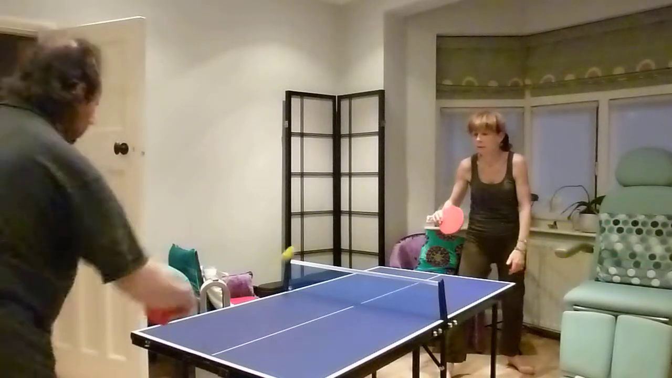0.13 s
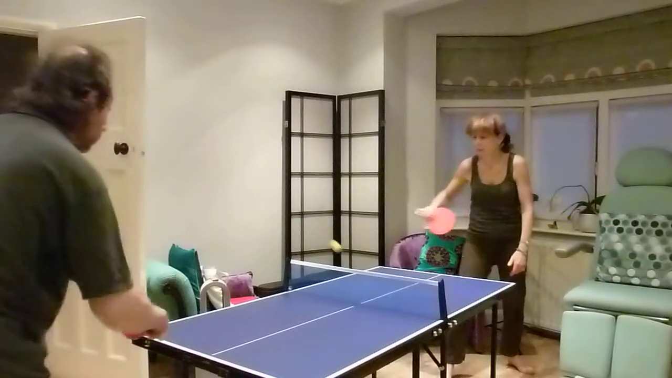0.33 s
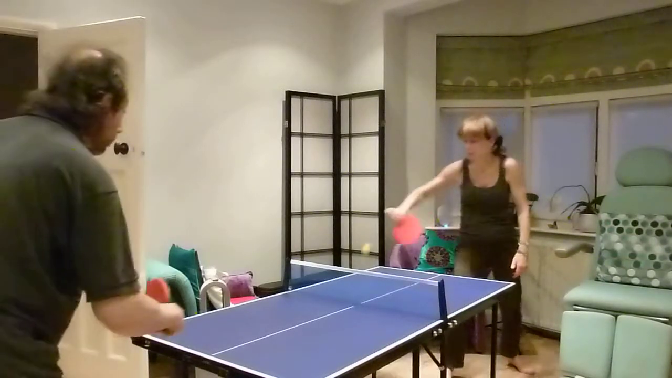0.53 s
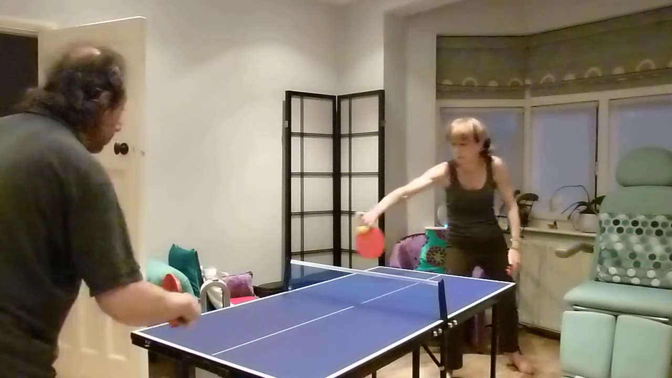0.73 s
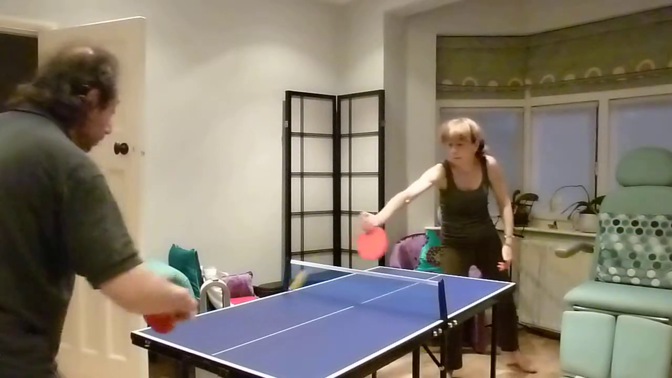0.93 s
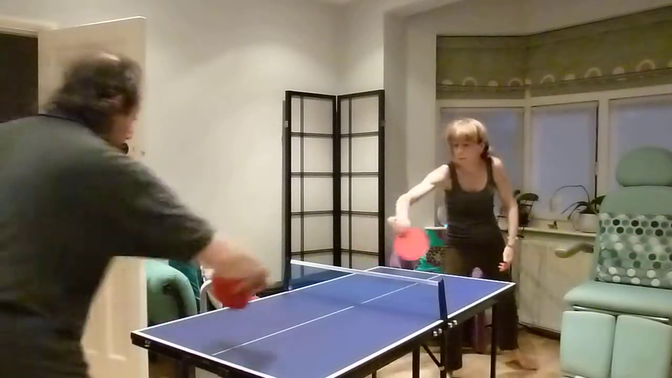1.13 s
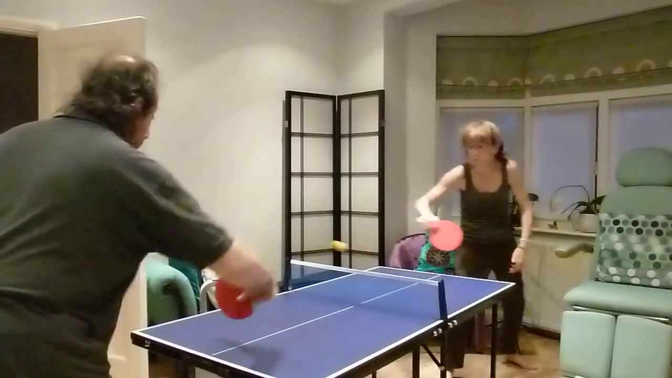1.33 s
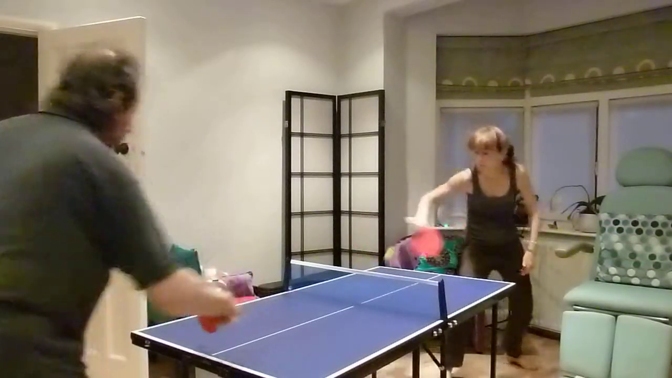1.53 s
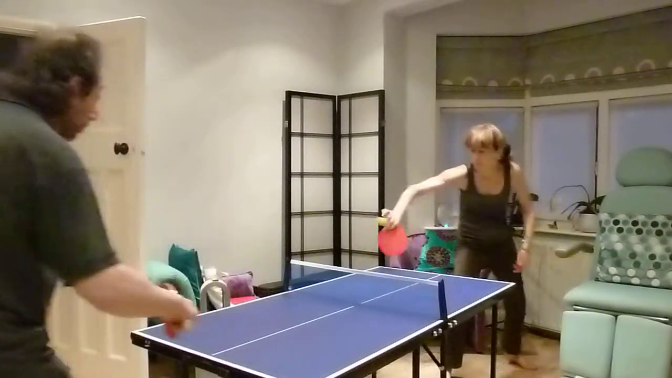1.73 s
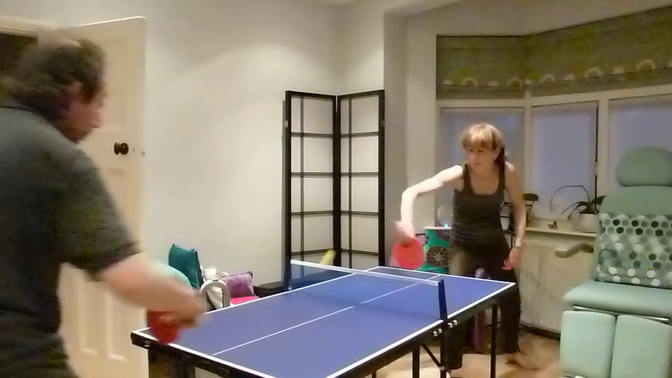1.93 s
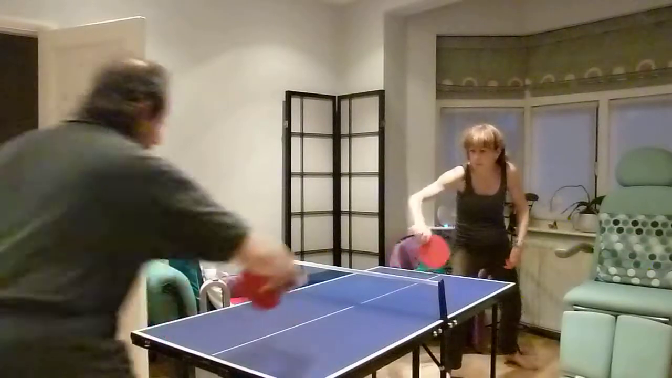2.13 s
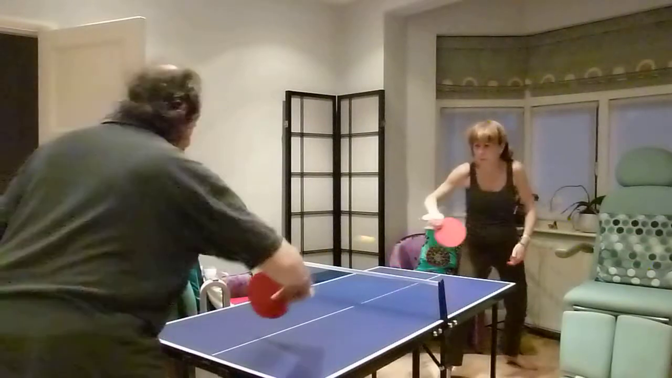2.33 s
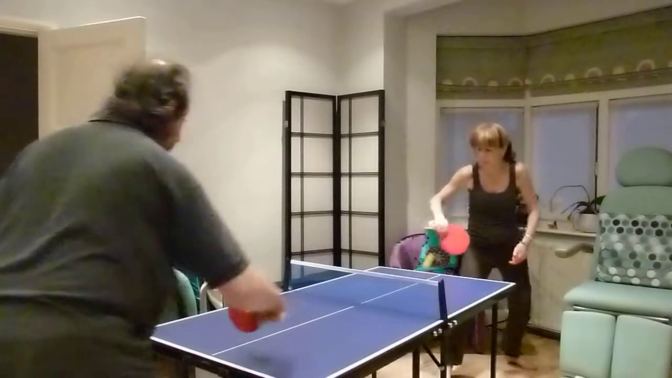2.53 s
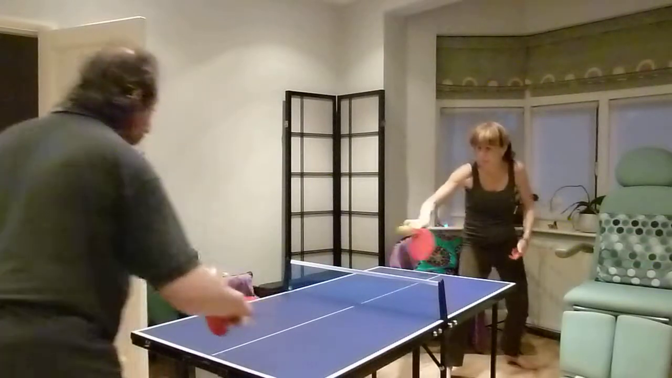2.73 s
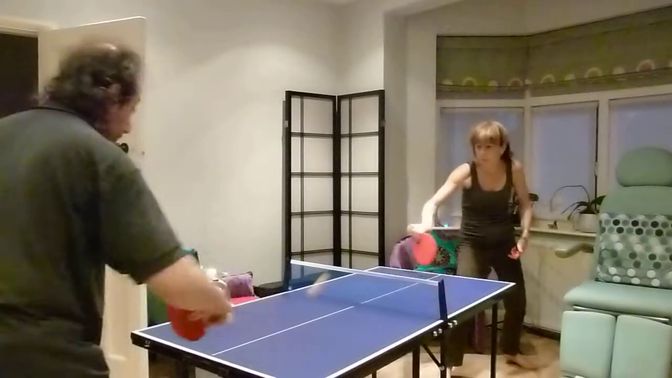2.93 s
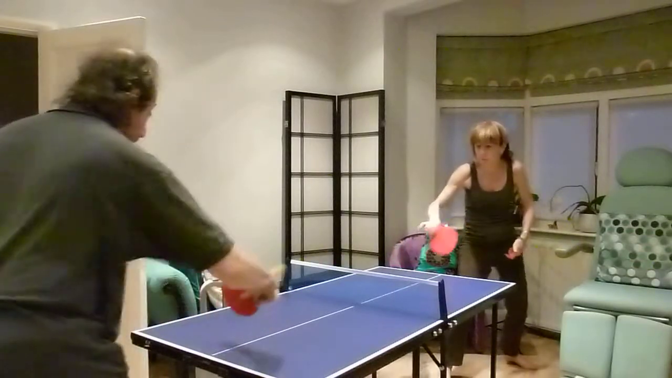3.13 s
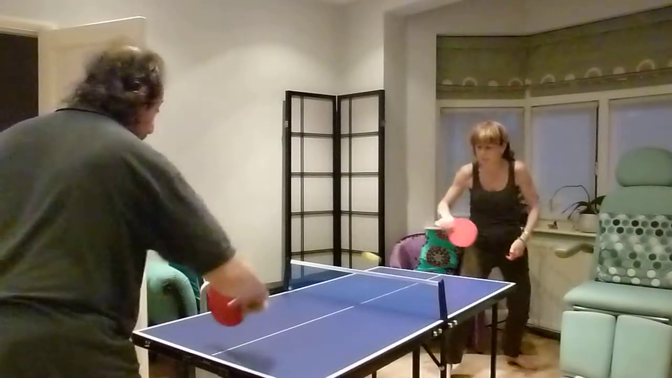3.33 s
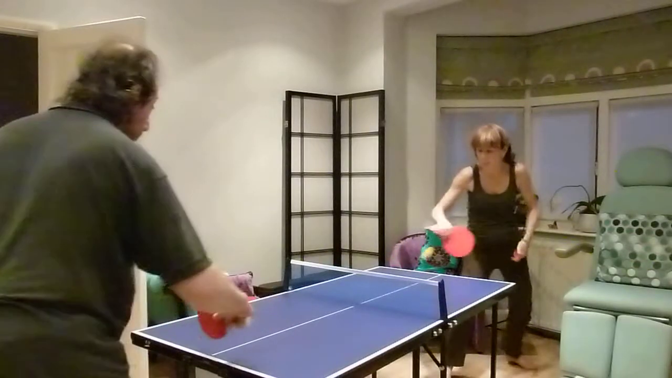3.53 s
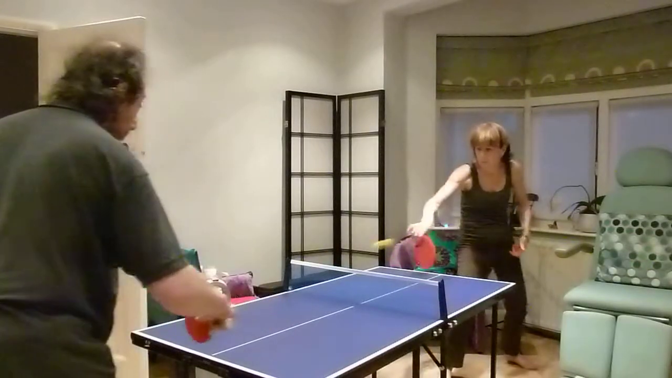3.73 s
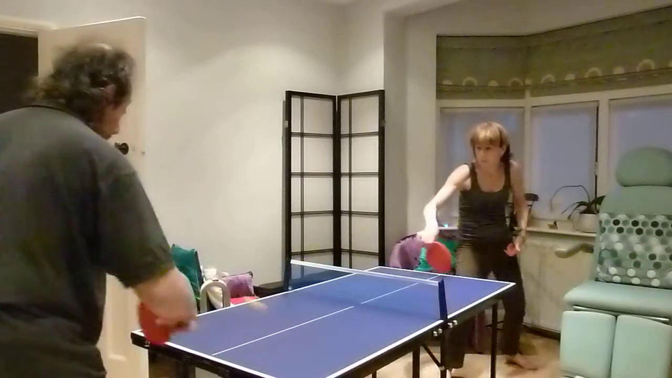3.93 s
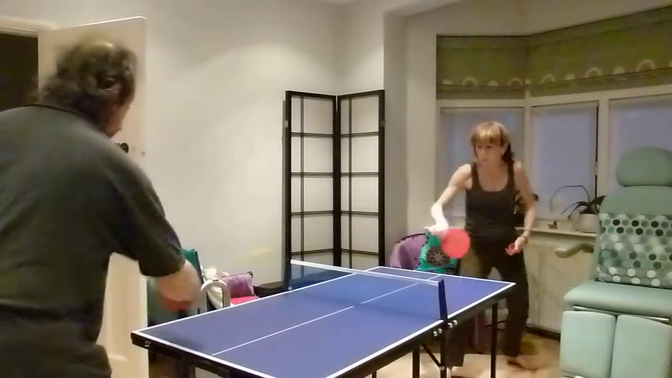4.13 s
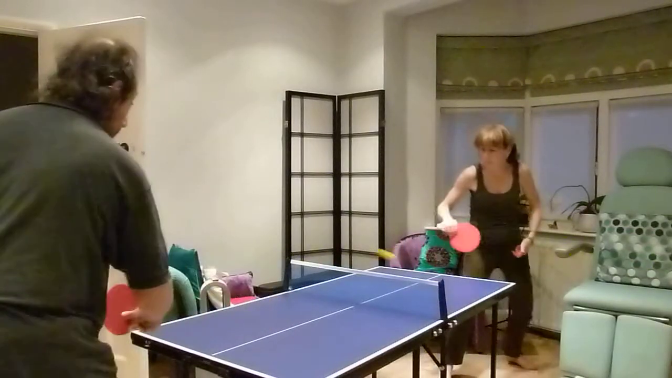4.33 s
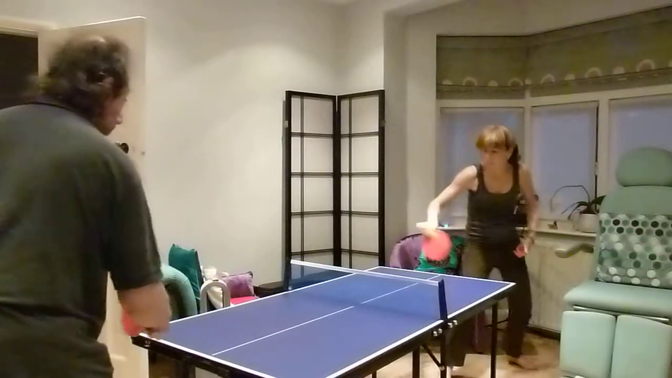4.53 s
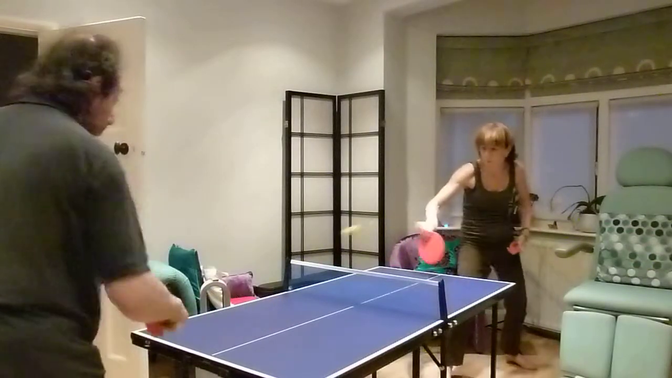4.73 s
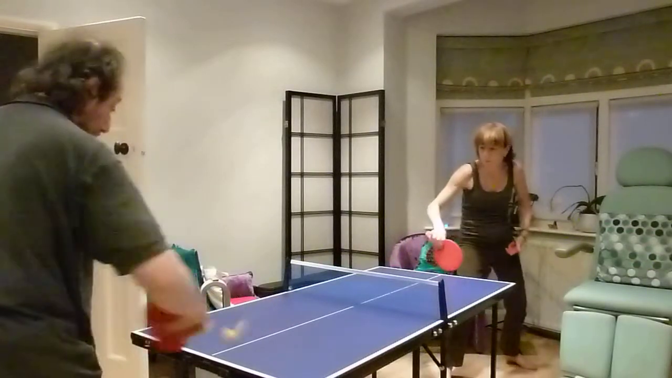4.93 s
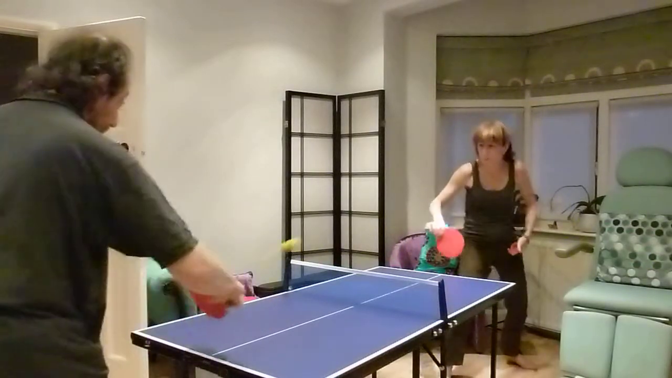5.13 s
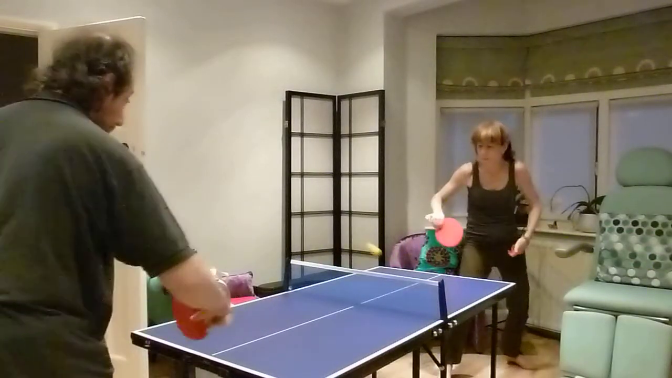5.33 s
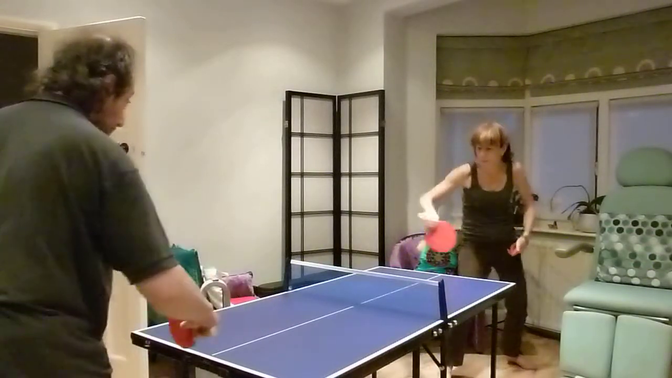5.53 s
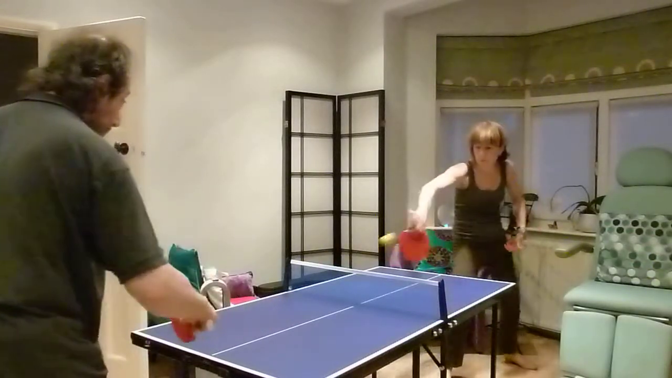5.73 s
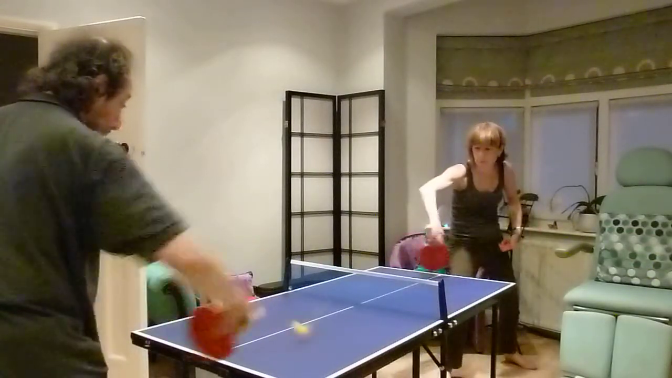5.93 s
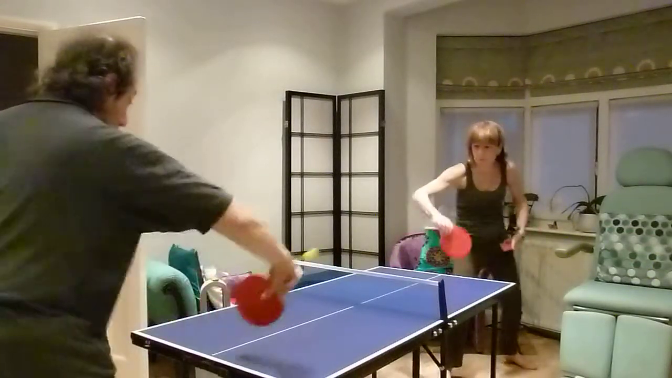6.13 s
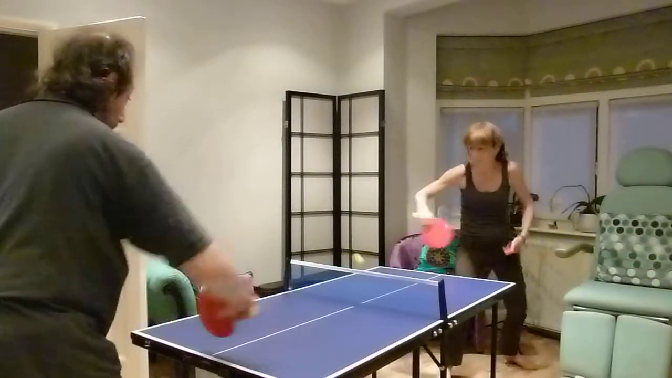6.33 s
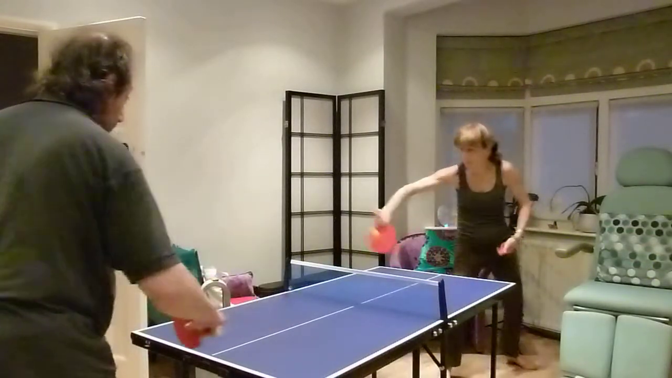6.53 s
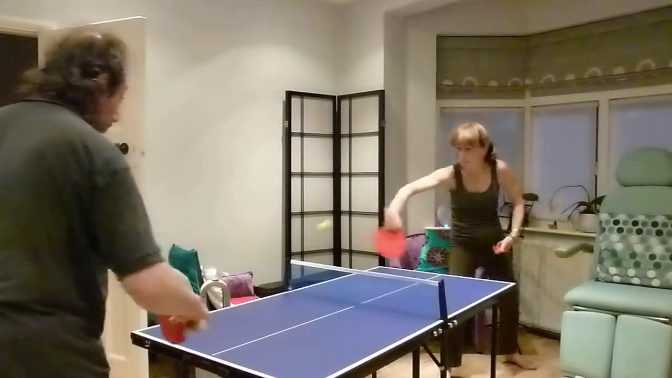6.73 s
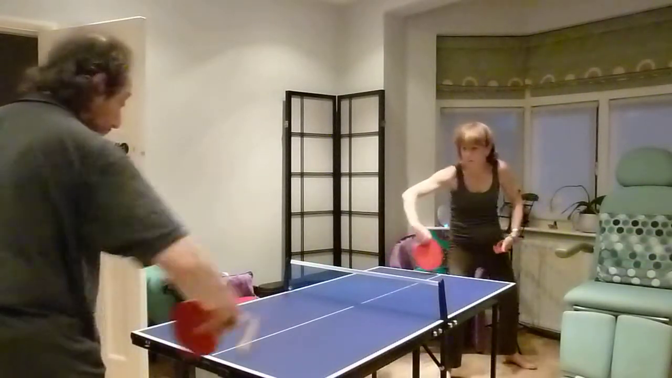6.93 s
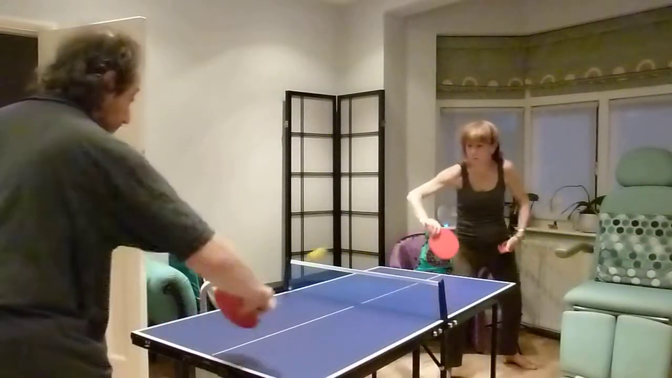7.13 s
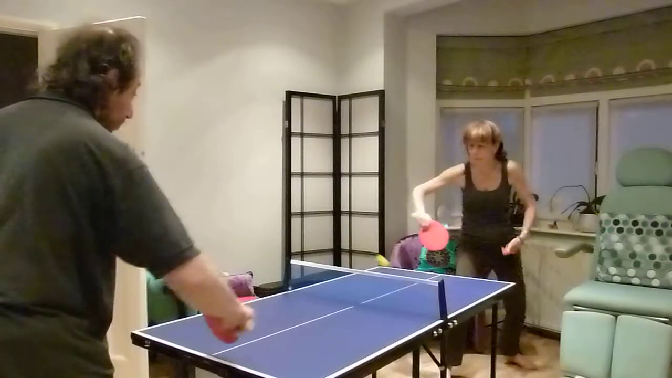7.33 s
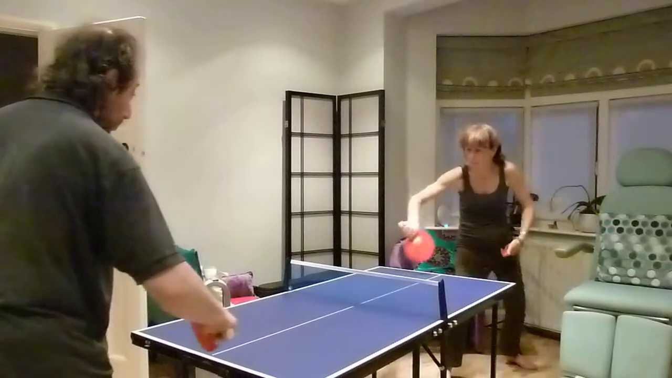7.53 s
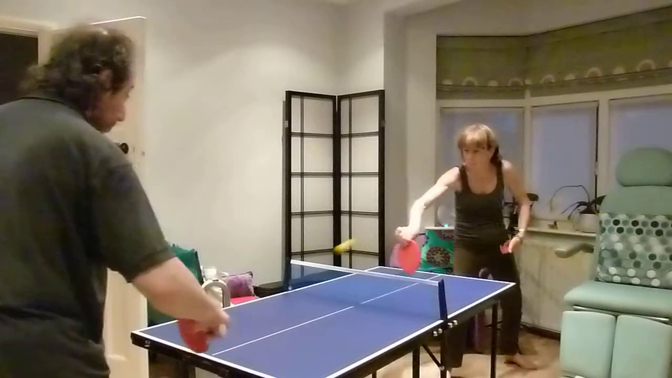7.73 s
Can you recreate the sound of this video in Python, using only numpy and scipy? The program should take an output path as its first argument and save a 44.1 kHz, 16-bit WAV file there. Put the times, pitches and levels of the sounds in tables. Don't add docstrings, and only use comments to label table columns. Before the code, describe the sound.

Crisp, dry knocks and clicks of a light hollow ball keep an even rhythm without a miss. Near table bounces are strongest, far ones a little weaker; the wooden bats with rubber give shorter, quieter pocks with a brief woody ring. Feet thump softly in the first couple of seconds, with one faint scuff late. A live domestic room answers for about half a second, captured close by a small camera with slightly limited treble.

```python
import sys
import numpy as np
from scipy import signal
from scipy.fft import rfft, irfft
from scipy.io import wavfile

SR = 44100
rng = np.random.default_rng(int(sys.argv[2]) if len(sys.argv) > 2 else 0)


def transcribe(u):
    v = np.clip(np.atleast_2d(u).T, -1, 1)
    q = np.round(v * 32767).astype(np.int16)
    wavfile.write(sys.argv[1], SR, q)


def voltage_ratio(level):
    return 10 ** (np.asarray(level, float) / 20)


N = 347111
TAIL = int(.75 * SR)
SINCE_BLOW = np.arange(SR // 4) / SR


def at_hz(points, hz):
    point_hz, value = np.array(points).T
    return np.interp(np.log(hz + 1), np.log(point_hz), value)


def two_ports(mid, side, hz):
    # (frequency [Hz], likeness [0-1])
    likeness = [(40, .96), (110, .999), (400, .998), (800, .92), (2200, .8), (4500, .5), (7000, .65),
                (8000, .98)]
    alike = np.clip(at_hz(likeness, hz), 0, 1)
    opposite = np.array([[1], [-1]])
    return np.sqrt((1 + alike) / 2) * mid + np.sqrt((1 - alike) / 2) * side * opposite


def air():
    # (frequency [Hz], density [dB per Hz])
    hush_spectrum = [(18, -55), (36, -14.5), (200, -5.5), (850, -17), (2560, -25.5), (6010, -26),
                     (7400, -35), (9620, -56.5)]
    hz = np.fft.rfftfreq(N, 1 / SR)
    noise = two_ports(*rfft(rng.standard_normal((2, N))), hz)
    hush = irfft(noise * voltage_ratio(at_hz(hush_spectrum, hz)), N)
    return voltage_ratio(-52) * hush / np.std(hush)


def echoes():
    density = np.clip(.07 + (np.arange(TAIL) / SR / .035) ** 2, 0, 1)
    arrives = rng.random(TAIL) < density
    return rfft(rng.standard_normal((2, TAIL)) * arrives / np.sqrt(density))


def room_answer(place, direct_db, first_echo_s):
    # (frequency [Hz], t60 [s])
    room_t60 = [(80, 0.44), (250, 0.48), (700, 0.46), (2000, 0.47), (4000, 0.46), (8000, 0.36)]
    # (frequency [Hz], share [0-1])
    same_room = [(250, .8), (700, .4), (1500, 0)]
    edge_on_hz = 4500
    t, hz = np.arange(TAIL) / SR, np.fft.rfftfreq(TAIL, 1 / SR)

    same = at_hz(same_room, hz)
    reflections = np.sqrt(same) * place + np.sqrt(1 - same) * echoes()
    ports, answer = two_ports(*reflections, hz), 0
    for k, (_, t60) in enumerate(room_t60):
        band = [(band_hz, j == k) for j, (band_hz, _) in enumerate(room_t60)]
        answer = answer + irfft(ports * at_hz(band, hz), TAIL) * voltage_ratio(-60 * t / t60)

    early = 1 + 1.2 * np.exp(-t / 0.012)
    answer = answer * early * np.clip(t / first_echo_s - .5, 0, 1) * 0.055
    fade = np.exp(-2 * np.pi * edge_on_hz / SR)
    answer += voltage_ratio(direct_db) * (1 - fade) * fade ** np.arange(TAIL)
    return answer


def add(mix, sound, s):
    at = round(s * SR)
    part = sound[:, max(-at, 0):N - at]
    mix[:, max(at, 0):max(at, 0) + part.shape[1]] += part


def blow(s, peak_db, modes, colour, click, beam, place, direct_db, first_echo_s, spread_cycles):
    t = SINCE_BLOW
    hz, mode_db, t60 = np.array(modes).T[:, :, None]
    pitch_luck, level_luck = rng.standard_normal((2, len(modes), 1))
    spot_hz = hz * (1 + .005 * pitch_luck)
    ring_db = mode_db + at_hz(colour, hz) + 1.3 * level_luck - 60 * t / t60
    swell = 1 - np.exp(-t * hz / spread_cycles)
    rings = voltage_ratio(ring_db) * swell * np.sin(2 * np.pi * spot_hz * t)
    body = rings[::2].sum(axis=0) - rings[1::2].sum(axis=0) + click
    heard = signal.fftconvolve(room_answer(place, direct_db, first_echo_s), body[None], axes=1)

    beam_hz, beam_width_hz, beam_db = beam
    resonance = signal.iirpeak(beam_hz, beam_hz / beam_width_hz, SR)
    heard[:, :len(t)] += voltage_ratio(beam_db) * signal.lfilter(*resonance, click)
    out = np.zeros((2, N))
    add(out, voltage_ratio(peak_db) * heard, s - .0006)
    return out


def strokes(events, modes, blade_hz, crack_db, direct_db, first_echo_s, spread_cycles):
    mix, place = 0, echoes()
    no_beam = (3000, 400, -90)
    crack_t = SINCE_BLOW / .00008
    crack = np.gradient(np.exp(-crack_t) * crack_t)
    for s, peak_db, *upper_db, tick_db in events:
        click = voltage_ratio(crack_db + tick_db) * crack
        colour = list(zip(blade_hz, (0, *upper_db, tick_db)))
        mix = mix + blow(s, peak_db, modes, colour, click, no_beam,
                         place, direct_db, first_echo_s, spread_cycles)
    no_bass = signal.butter(2, 170, "high", fs=SR, output="sos")
    return signal.sosfilt(no_bass, mix + 1e-18)


def press(t, contact_s):
    along = np.clip(t / contact_s, 0, 1)
    return np.sin(np.pi * along) * np.exp(-.2 * along)


def bounces(events, modes, beam, force_db, direct_db, first_echo_s, spread_cycles):
    mix, place = 0, echoes()
    small = signal.butter(2, 2800, "high", fs=SR, output="sos")
    for s, peak_db, boom_db, click_db, contact_ms in events:
        click = voltage_ratio(force_db + click_db) * signal.sosfilt(small, press(SINCE_BLOW, contact_ms / 1000))
        colour = [(250, boom_db), (550, 0)]
        mix = mix + blow(s, peak_db, modes, colour, click, beam,
                         place, direct_db, first_echo_s, spread_cycles)
    return mix


def feet():
    # (time [s], length [s], thump [dB], scuff [dB])
    footfalls = [
        (0.246, 0.041, -40.5, -49.5),
        (0.901, 0.067, -48, -56),
        (1.307, 0.046, -38, -43),
        (1.454, 0.021, -36, -45.5),
        (1.998, 0.094, -36.5, -60.5),
        (2.186, 0.09, -34, -45),
        (3.754, 0.016, -63.5, -72),
        (4.167, 0.027, -47.5, -64),
        (5.82, .03, -68, -60),
        (6.566, 0.015, -61, -40),
    ]
    mix, t = np.zeros((2, N)), SINCE_BLOW
    dull = signal.butter(2, [110, 450], "band", fs=SR, output="sos")
    bright = signal.butter(1, [1500, 7000], "band", fs=SR, output="sos")
    for s, length, thump_db, scuff_db in footfalls:
        rub = rng.standard_normal((2, len(t))) * (t / length) * np.exp(1 - 2 * t / length)
        thump = voltage_ratio(thump_db + 13.5) * signal.sosfilt(dull, rub[0])
        scuff = voltage_ratio(scuff_db + 6) * signal.sosfilt(bright, rub[1])
        room = room_answer(echoes(), -24.5, 0.001)
        add(mix, signal.fftconvolve(room, (thump + scuff)[None], axes=1), s)
    return mix


def scene():
    # (time [s], peak [dB], boom [dB], click [dB], contact [ms])
    near_bounces = [(0.043, -2, -6, -3, .596), (1.017, -4.5, -3, -2.5, .566), (2.054, -4.5, -2.5, -1, .646),
                    (3.02, -5.5, -2, 0, .598), (3.9445, -5, -5.5, -1.5, .592),
                    (4.971, -3.5, -6.5, -4, .662), (5.962, -3.5, -8, -3, .584),
                    (6.984, -3.5, -9.5, -3.5, .648)]
    far_bounces = [(0.477, -6.5, 1.5, -1.9, 0.648), (1.5055, -6, -1.5, -2.3, 0.61),
                   (2.536, -7.5, 0.5, -0.53, .658), (3.4755, -9, -0.5, -1.1, 0.57),
                   (4.439, -10, 1, 1.5, 0.55), (5.472, -9, 2.5, 0.93, .624), (6.428, -7, -2.5, -2.6, .66),
                   (7.438, -8.5, 2, -1.3, .67)]
    # (time [s], peak [dB], lower of the upper modes [dB], higher [dB], tick [dB])
    near_strokes = [(.066, -28, -10.5, -1, -11), (1.141, -18, -5.5, -2.5, 3.5), (2.1685, -19, -1, -8, 2.5),
                    (3.117, -14.5, -6.5, -7, 1.5), (4.080, -15.5, -0.5, -2, 3.5),
                    (5.027, -18, -5.5, -1, 4.5), (6.0545, -17, -6, 0.5, 5), (7.035, -27.5, 4, -0.5, 14)]
    # (time [s], peak [dB], upper modes [dB], tick [dB])
    far_strokes = [(-.2, -13, -3, 4.5), (.693, -19, -1.5, 0.63), (1.665, -21, 3.5, 4.5),
                   (2.647, -15.5, 0, 0.5), (3.6495, -17.5, 5.5, 0.5), (4.5265, -16.5, 7, 0.52),
                   (5.626, -18, 1.5, 0.5), (6.551, -20.5, 10.5, 4.4), (7.582, -23, 8.5, 4.2)]
    # (frequency [Hz], level [dB], t60 [s])
    near_half = [(85.9, -22.5, 0.31), (135.4, -19.5, 0.26), (214, -10.5, 0.067), (274.2, -1.5, 0.069),
                 (344, -4.5, 0.031), (440.4, -1, 0.034), (657, 9.5, 0.0087), (790, -0.5, 0.012),
                 (1291, 5.5, 0.009), (1450, 10, 0.0051), (2350, 1.5, 0.0019), (2660, -7.5, 0.0084)]
    far_half = [(61.7, -33, 0.35), (128.4, -26, 0.31), (198, -23, 0.051), (248.5, 1.5, 0.044),
                (332, -9.5, 0.045), (437.3, 2, 0.04), (617, 0.5, 0.023), (825, -5, 0.02),
                (1253, -8, 0.0096), (1315, -5, 0.011), (2125, -6.5, 0.0028), (2400, -3, 0.0041)]
    near_blade = [(544, -8, 0.016), (912.3, -5.5, 0.1), (1350, 9, 0.0042), (1598, 4.5, 0.01),
                  (2155, -8, 0.033), (2515, -8.5, 0.01), (3230, 3.5, 0.00071), (4360, -7, 0.0022),
                  (6400, -33, 0.0015)]
    far_blade = [(570, 8, 0.0033), (881.4, 0.5, 0.043), (1370, 3, 0.0043), (1647, -6.5, 0.036),
                 (2030, 2.5, 0.0034), (2800, -4, 0.0042), (4370, -4, 0.0026), (5780, -12, 0.0037),
                 (7100, -3.5, 0.0006)]
    # (frequency [Hz], width [Hz], level [dB])
    near_beam, far_beam = (3400, 320, 5), (3200, 320, -2)
    near_blade_hz, far_blade_hz = (920, 1550, 2160, 3600), (880, 1620, 2200)

    far_bat = voltage_ratio(4.5) * strokes(far_strokes, far_blade, far_blade_hz, 2.1, 1.0, 0.0017, 0.3)
    near = voltage_ratio(-3.5) * bounces(near_bounces, near_half, near_beam, 21.54, 0.5, 0.0032, 0.62)
    near_bat = voltage_ratio(8.0) * strokes(near_strokes, near_blade, near_blade_hz, 0.93, 2.5, 0.0059, 0.5)
    far = voltage_ratio(-1.0) * bounces(far_bounces, far_half, far_beam, 22.7, -3.0, 0.0025, 1.0)
    moving = near + far + near_bat + far_bat + feet()
    no_rumble = signal.butter(3, 75, "high", fs=SR, output="sos")
    return signal.sosfilt(no_rumble, moving) + air()


def top_cut(x):
    return signal.sosfilt(signal.butter(12, 8920, fs=SR, output="sos"), x)


def record(dry):
    # (frequency [Hz], left lead [rad])
    port_phase = [(0, -.03), (950, -.1), (1210, -1.1), (2500, -.5), (3200, -.85), (3800, -.4), (4820, -.5),
                  (5940, 0)]
    # (frequency [Hz], level [dB])
    port_balance = [(230, 0), (560, 1.6), (880, 1.5), (1380, 0), (2170, .2), (8000, .3)]
    # (frequency [Hz], level [dB])
    top_edge = [(7300, -2), (7650, -6.5), (7950, -33), (8050, -27.5), (8300, -17), (8600, -25.5),
                (8900, -36.5), (9300, -99.5)]
    hz = np.fft.rfftfreq(N, 1 / SR)
    lead = np.interp(hz, *np.transpose(port_phase))
    left = voltage_ratio(at_hz(port_balance, hz) / 2) * np.exp(.5j * lead)

    rounded = 0.74 * np.tanh(dry / 0.85)
    no_drift = signal.butter(2, 32, "high", fs=SR, output="sos")
    heard = rfft(signal.sosfilt(no_drift, rounded)) * np.array([left, 1 / left])
    folded = np.abs(np.minimum(hz, 16000 - hz) * N / SR).round().astype(int)
    heard = np.where(hz < 8000, heard, heard[:, folded].conj())
    edge_gain = voltage_ratio(np.interp(hz, *np.transpose(top_edge)))
    return top_cut(irfft(heard * edge_gain, N))


dry = scene()
out = record(dry)
transcribe(out)
```